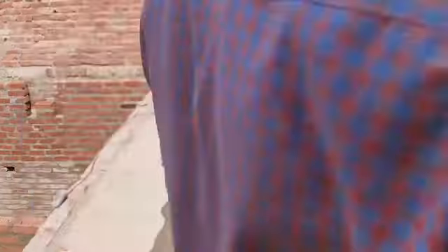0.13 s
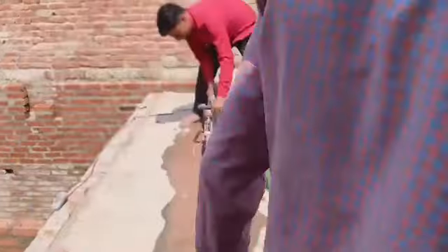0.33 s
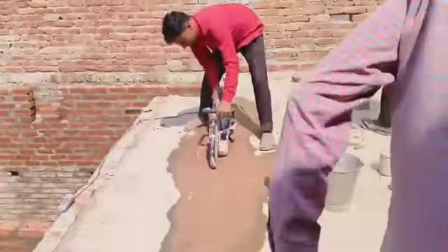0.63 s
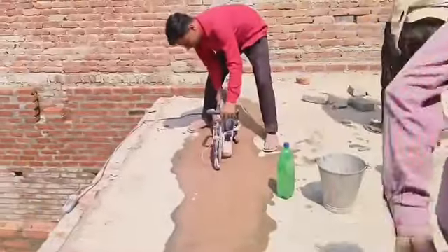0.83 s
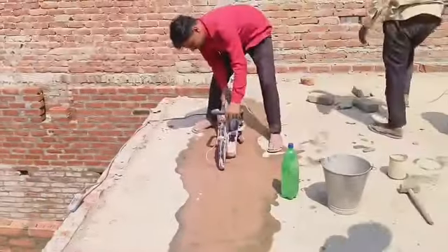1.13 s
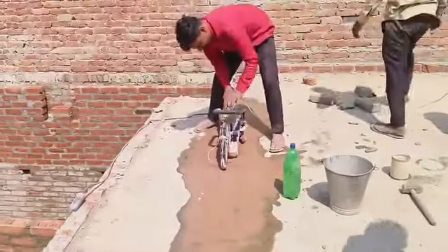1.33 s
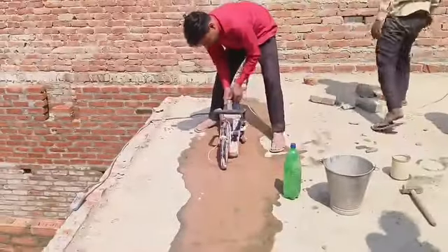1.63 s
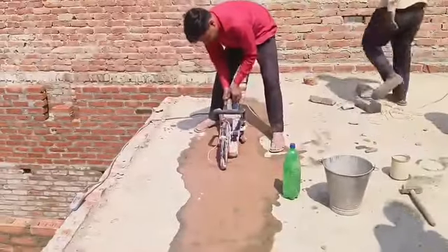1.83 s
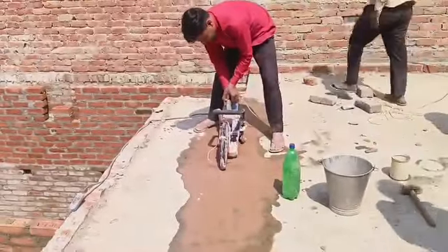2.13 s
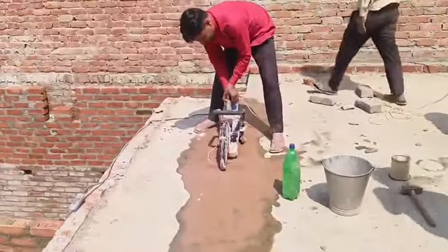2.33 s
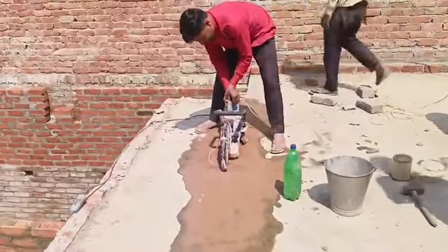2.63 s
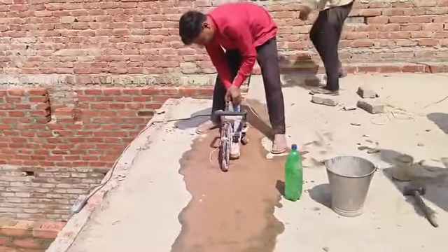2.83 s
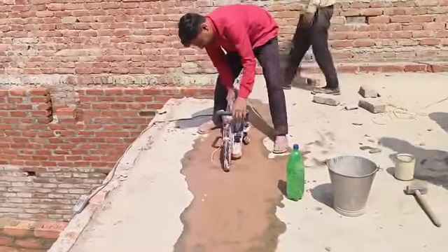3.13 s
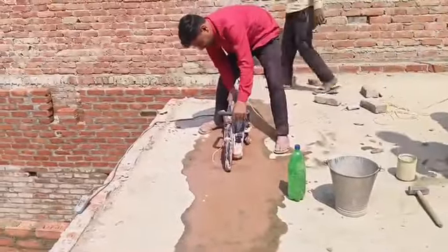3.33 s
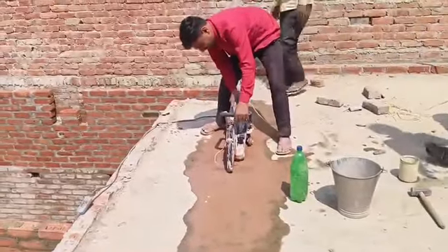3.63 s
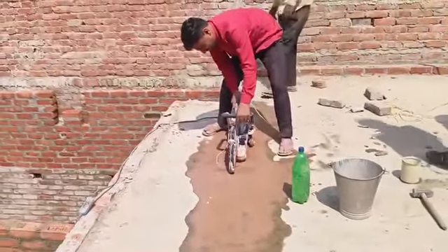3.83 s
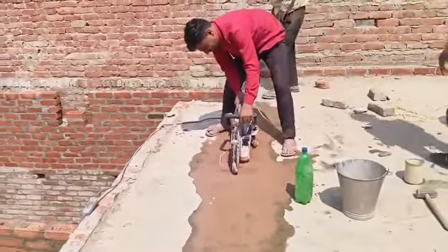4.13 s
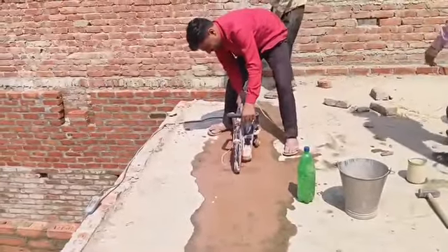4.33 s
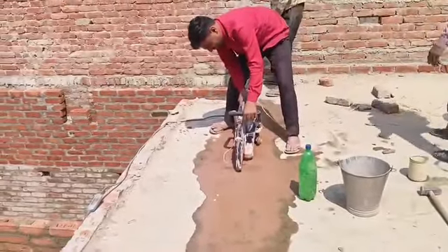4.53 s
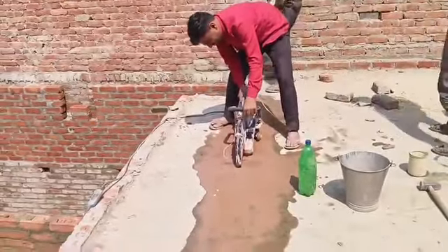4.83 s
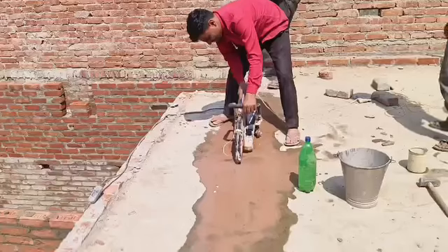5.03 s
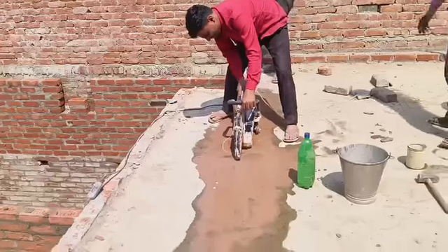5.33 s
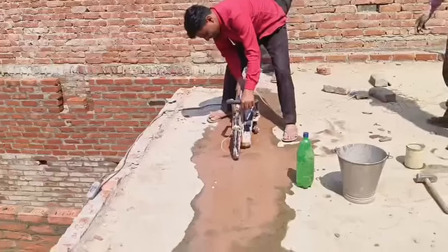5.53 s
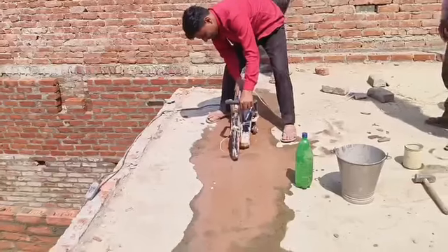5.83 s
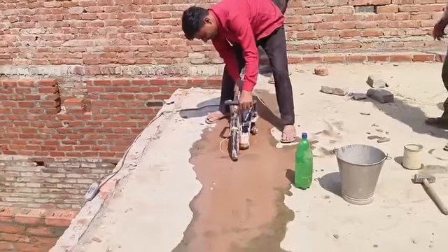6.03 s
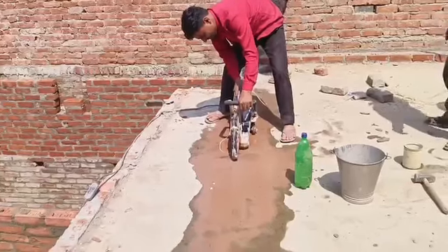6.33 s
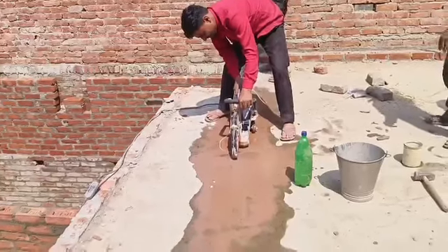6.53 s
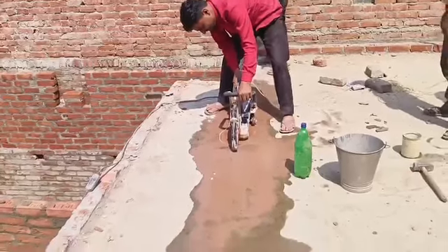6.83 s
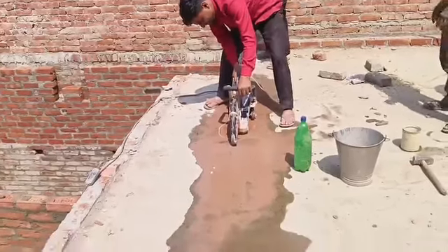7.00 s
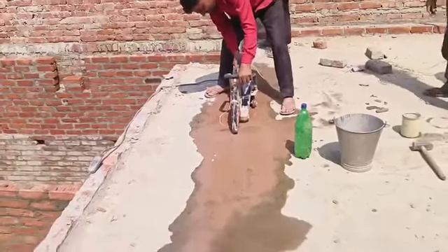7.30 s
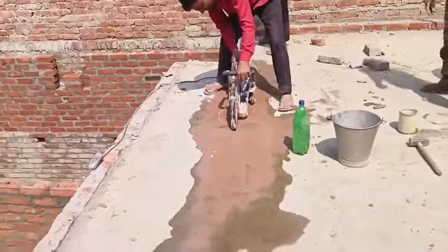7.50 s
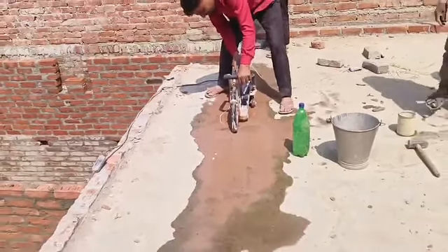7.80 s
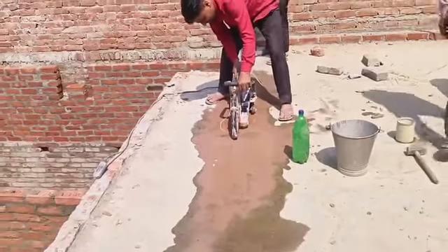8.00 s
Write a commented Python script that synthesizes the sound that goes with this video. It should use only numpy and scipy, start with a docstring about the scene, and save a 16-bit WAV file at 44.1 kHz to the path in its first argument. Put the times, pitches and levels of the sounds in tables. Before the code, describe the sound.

An electric saw works on a concrete slab a few metres away on an open rooftop. Its motor hums and the blade briefly bites, then eases off, the rubbing steel singing in high notes that step downward. Before halfway it digs in again and keeps grinding with a gritty, hissing chatter. The cut grows more hollow, and the metal guard rattles harder near the end.

```python
"""An electric saw with a wet blade cuts a concrete slab on an open rooftop, a few metres away.
First the motor hums, and at about 1 s the blade touches the slab once. It eases off: the motor slows
while rubbing makes the steel blade sing. At 3.5 s it bites in and chatters on. Tiny hits of grit ring
the blade guard and the slab, roof and walls scatter the sound, and the groove sounds more hollow as
the blade sinks. Near the end the saw is leaned on, and the guard rattles harder."""
import sys
import numpy as np
from scipy import signal
from scipy.fft import rfft, irfft
from scipy.io import wavfile
from scipy.ndimage import uniform_filter1d, map_coordinates

SR = 44100
rng = np.random.default_rng(int(sys.argv[2]) if len(sys.argv) > 2 else 0)


def int16_out(signal):
    """Quantize to a 16-bit WAV file."""
    q = np.round(np.clip(np.atleast_2d(signal).T, -1, 1) * 32767)
    wavfile.write(sys.argv[1], SR, q.astype(np.int16))


N = 359856
T = np.arange(N) / SR
HZ = np.maximum(np.fft.rfftfreq(N, 1 / SR), 1)

# How hard the blade bites (a touch, a long easing off, then the cut): time_s, level_db
BITE = [(0, -34.5), (.3, -37.5), (.77, -40), (.875, -29), (1.04, -28), (1.11, -34.5), (1.42, -34),
        (2.15, -37.5), (3.3, -38), (3.5, -34.5), (3.545, -26), (3.78, -27.5), (3.95, -27.5), (5.05, -28),
        (5.45, -29), (6.45, -28), (7.799, -29.5), (8.16, -30)]
# The blade grabs hard: time_s, rise_db, length_s
GRABS = [(0.536, 1, .035), (1.01, 0.5, 0.031), (1.74, 3.5, 0.035), (1.967, 2, 0.078), (2.474, 2, 0.11),
         (2.728, 4, 0.033), (3.323, 3, 0.032), (3.573, 0.5, 0.02), (3.6, 2.5, .012), (3.762, 1, .02),
         (3.79, 3.5, 0.032), (3.85, 3, 0.0074), (3.927, 0.5, 0.007), (4.169, 4, 0.018),
         (4.201, 3.5, 0.0089), (4.362, 3, 0.042), (4.474, 1, 0.03), (5.26, 2, 0.051), (5.593, 0.5, 0.053),
         (5.702, 1.5, 0.027), (5.882, 3, 0.023), (5.948, 3.5, .025), (6.006, 5.5, 0.015), (6.132, 5, 0.017),
         (6.198, 2.5, 0.0065), (6.367, 3.5, 0.051), (6.47, 5, 0.018), (6.7, 1, 0.03), (7.054, 1.5, .035),
         (7.217, 4, 0.067), (7.308, 2.5, 0.013), (7.467, 1, 0.042), (7.756, 1, 0.15)]
# The blade loses its grip for a moment: time_s, fall_db, half_length_s
SLIPS = [(3.96, 0.5, 0.036), (5.504, 1.5, 0.063), (6.32, 1.5, 0.016), (7.005, 3, 0.02), (8.06, 2, 0.011)]
# Overall tone of the grinding, from bass to treble: pitch_hz, gain_db
GRIND_TONE = [(25, -28), (48, -13), (95, -7), (150, -11.5), (230, -3.5), (330, -4.5), (490, -7.5),
              (800, 5.5), (1400, -2.5), (2000, -7), (4500, 1.5), (7500, 1.5), (8100, -10.5), (15500, -10.5)]
# Pitches that guard, blade and slab boost or weaken: pitch_hz, width_hz, left_db, right_db
RESONANCES = [(308.6, 29, 3.5, 5), (377.3, 74, 10.5, 3), (414, 21, 4.5, 0), (513, 45, -18.5, 0.5),
              (610, 90, -9, -3), (658, 28, 12.5, 3), (790, 110, -6.5, -0.5), (930, 117, 6.5, 5.5),
              (1250, 140, 2, 3), (1463, 126, -8.5, -13.5), (1588, 36, 8.5, 2), (1860, 180, 0, 0.5),
              (2346, 380, 1.5, 5), (2890, 54, -12, -14), (2980, 110, 4, -4.5), (3994, 280, 6, -2),
              (4300, 58, -3, 0), (4420, 97, 3.5, 3), (4880, 160, 3, 5.5), (5260, 110, 4, 5.5),
              (5370, 80, -7, -3), (5520, 60, 3, 5.5), (5590, 150, -13, -1), (5945, 200, 4, 4),
              (6700, 650, 5.5, -2.5), (7880, 54, -7, -6), (7960, 45, 9, 5), (8050, 120, -5, -5),
              (8230, 60, 4, 4), (8470, 80, -14, 0), (13560, 660, 4.5, 7)]
# Sound that differs between the ears, against the sound they share: pitch_hz, level_db
EAR_DIFFERENCE = [(40, -37), (130, -20), (350, -22), (700, -4.5), (1400, -2), (3000, -0.5), (5000, -3.5),
                  (15000, -2)]
# The grinding shifts sideways as people pass: time_s, left_minus_right_db
GRIND_PAN = [(0, -0.5), (.2, -3.5), (.55, 3), (.8, 2), (1.05, 0), (1.5, 0), (3.5, -0.1), (8.16, -1)]
# How deep the blade sits: time_s, depth_0_to_1
BLADE_DEPTH = [(3.7, 0.1), (5.2, 0.29), (6.8, 0.35), (7.6, 0.73)]
# Peaks and dips that change with depth: shallow_hz, deep_hz, width_hz, shallow_db, deep_db
GROOVE_PEAKS = [(1930, 1900, 410, -0.5, 9.5), (1980, 2260, 180, 1, -0.5), (2460, 2180, 150, 2.5, -14),
                (3380, 3600, 170, -6, 3), (3690, 3700, 51, -6.5, -7), (4220, 5600, 77, 1, 4),
                (6100, 6440, 240, -2, 7.5), (7140, 6700, 210, -1, -6.5)]
# Pitches brought out by rubbing on the groove's side: start_s, end_s, pitch_hz, width_hz, rise_db
RUBS = [(.55, 1.4, 3400, 420, 7.5), (0.723, 1.19, 2580, 300, 8), (3.52, 3.98, 4930, 1200, 2.5),
        (3.4, 5.2, 1850, 160, 1), (3.45, 7, 2320, 350, 2.5), (4.4, 7.003, 4320, 130, 4.5),
        (4.897, 6.9, 3115, 110, 8), (4.948, 8.3, 3294, 70, 9), (5.5, 6.9, 4720, 320, 3.5),
        (6.195, 6.8, 2390, 400, 4), (7.004, 8.11, 6100, 700, 1.5), (7.3, 8.2, 3990, 140, 1)]
# Narrow peaks and dips come and go at random as the saw rocks: pitch_hz, swing_db
ROCKING = [(500, 0), (1200, 1.9), (2200, 3.3), (5500, 3.0), (9000, 3.0), (15000, 2.6)]
# How hard the slab drums under the saw: time_s, level_db
SLAB_DRUMMING = [(0, -47), (.33, -35), (.55, -43), (1.07, -39), (1.3, -51.5), (2.1, -49), (2.75, -48),
                 (3.15, -48), (3.48, -44.5), (3.6, -40.5), (4.1, -39.5), (5.1, -36), (5.32, -32),
                 (5.5, -36.5), (6.65, -35.5), (7.1, -35.5), (7.28, -34.5), (7.6, -37), (8.16, -38)]
# The saw kicks, jolting the slab and the housing's drone: time_s, slab_change_db, drone_rise_db
KICKS = [(.419, 3, 3), (.76, -3, 12), (1.016, 0, 5), (2.79, 7, 6), (3.646, 6, 12), (3.818, 6, 12),
         (4.086, -6, 13), (4.3, 10, 2), (4.405, 4, 13), (4.677, -2, 15), (4.952, 2, 12.5), (5.02, 5, 2),
         (5.234, 6, 7), (5.281, -7, 16), (5.365, 4, 15.5), (5.428, -6, 11.5), (5.616, 4, 17),
         (5.715, 10, 4), (5.81, 3.5, 12), (5.963, -2, 11), (6.034, 4, 9.5), (6.286, 6.5, 7), (6.375, -1, 3),
         (6.555, -1, 3), (6.824, 6, 10), (7.05, 2, 11.5), (7.11, 5.5, 7), (7.211, 1, 12), (7.27, -2, 15),
         (7.337, -2, 14), (7.407, 0, 12), (7.459, 3, 12), (7.79, -2, 17), (7.904, -3, 16), (8.013, 4.5, 9),
         (8.102, -1, 15.5)]
# The blade sings one note after another as it slows:
# start_s, end_s, pitch_hz, fall_hz_per_s, bend_at_ends_hz, level_db, left_minus_right_db, roughness
BLADE_NOTES = [(0.349, 0.695, 4240, 33, 0.5, -39.5, 23, 0.78),
               (0.679, 0.85, 4230, 156, 1, -30.5, 21.5, 0.63), (.97, 1.2, 3320, 100, 0, -36, 0, 1.1),
               (1.172, 1.616, 3285, 108, 0, -31.5, 0, 0.74),
               (1.799, 2.433, 3255, 107.5, 1.5, -34.5, 5, 0.9), (2.06, 2.462, 3090, 131, 1, -32.5, 8, 0.66),
               (2.24, 2.55, 2950, 156, -2, -31, 3, 0.3), (2.566, 2.843, 2935, 0, 0.5, -32, 0, 0.84),
               (2.869, 3.636, 2726, 3, 42.5, -30, -6.5, 0.38)]
# The notes the guard rattles on: pitch_hz, rough_width_hz, gain_db
GUARD_NOTES = [(398, 37, 6.5), (666.5, 44, 9), (740, 38, 3), (1590, 54, -18), (1860, 140, -8)]
# How fast the motor turns: time_s, speed_hz
MOTOR_SPEED = [(0, 355), (.6, 353), (.9, 335), (1.2, 311), (1.7, 292), (2.15, 275), (2.9, 252), (3.2, 245),
               (3.6, 246)]
# The motor's hum swells: start_s, end_s, level_db
HUM_SWELLS = [(-.2, 0.9, -45), (1.1, 2.273, -48.5), (2.84, 3.595, -52.5)]
# Tone of the light air over the rooftop: pitch_hz, gain_db
AIR_TONE = [(25, -13), (48, 12), (100, 6), (160, -22), (500, 1), (2000, -46), (15000, -60)]

FREE_BITE_DB, LOADED_BITE_DB = -37, -30  # the blade runs free; the blade is fully loaded
USUAL_DRUM_DB, LOADED_MOTOR_HZ = -35.5, 246  # the slab and the motor during the cut
SIDES = np.array([[.5], [-.5]])  # a sideways shift raises one ear and lowers the other by half each


def grinding(blade_angle, motor_hz, bite_db, drum_db, load, chatter_db):
    """Grit rings the slab, guard and blade, pulsed by each turn and grab. Gives (bass, the rest)."""
    # a free blade brushes the groove once a turn; a loaded one judders
    force_db = chatter_db + 0.21 * wobble(47) + (.9 - 1.04 * load) * np.cos(blade_angle)
    sound = groove(ringing_parts())
    # each copy keeps only what lies below its pitch
    deck, slab, guard, disc = (shape(sound, 1 / (1 + (HZ / hz) ** 10)) for hz in (290, 520, 1450, 3600))
    push_db = bite_db - LOADED_BITE_DB
    throb_db = 2.05 * shiver(21.2) + kicks()[0]
    shake_db = drum_db - USUAL_DRUM_DB + throb_db
    # heavy parts sound low and follow the bite weakly; the grit's hiss follows it fully
    thud = unit(deck) * undb(-45.5 + 0.54 * push_db + 0.54 * shake_db + 0.7 * force_db)
    drum = unit(slab - deck) * undb(drum_db - 2 + throb_db + 0.46 * force_db)
    speed_db = 0.025 * (motor_hz - LOADED_MOTOR_HZ)  # a faster motor makes the guard growl more
    growl = unit(guard - slab) * undb(-38.5 + 0.63 * push_db + 0.25 * shake_db + force_db + speed_db)
    ring = unit(disc - guard) * undb(-32 + 0.55 * push_db + 0.68 * force_db + 1.17 * load * snags())
    hiss = unit(sound - disc) * undb(bite_db + 2 + force_db + load * snags())
    return thud + drum, growl + ring + hiss


def grit(hits_per_s, unevenness_db):
    """A dense spray of tiny hits of diamond on stone, a few harder than the rest."""
    hits = rng.random(N) < hits_per_s / SR
    strength = rng.standard_normal(N)
    extra_db = unevenness_db * np.minimum(rng.exponential(size=N), 5)
    return unit(hits * strength * undb(extra_db))


def ringing_parts():
    """Each hit of grit sets guard, blade and slab ringing, a little differently for each ear."""
    shared, around = (echoes(grit(hits_per_s=20000, unevenness_db=1.53)) for _ in range(2))
    spread = undb(spectrum(EAR_DIFFERENCE))
    shared = shape(shared, 1 / np.hypot(1, spread))
    around = shape(around, spread / np.hypot(1, spread))
    ears = []
    for ear, hits in enumerate((shared + around, shared - around)):
        peaks_db = sum(ear_db[ear] * peak(HZ, hz, width) for hz, width, *ear_db in RESONANCES)
        ears.append(shape(hits, ringing_filter(spectrum(GRIND_TONE) + peaks_db)))
    return np.array(ears)


def chatter(load, attack_share=0.71, release_share=0.62, slack_s=0.3, slack_share=0.16):
    """Swing of the cutting force in dB: the blade judders more under load, grabs and slips."""
    db = (0.5 + 0.26 * load) * shiver(26)
    for time_s, rise_db, length_s in GRABS:
        near = np.abs(T - time_s) < .4
        lag = T[near] - time_s
        width_s = length_s * np.where(lag < 0, attack_share, release_share)
        grab = np.exp(-(lag / width_s) ** 2)
        slack = slack_share * np.exp(-(lag / slack_s) ** 2)  # the blade runs slack around a grab
        db[near] += rise_db * (grab - slack)
    return db - sum(fall_db * bump(T - time_s, half_s) for time_s, fall_db, half_s in SLIPS)


def snags(per_s=45, fade_s=.011):
    """Swing in dB as hard pebbles suddenly catch the rim and crumble away."""
    hits = (rng.random(N) < per_s / SR).astype(float)
    push = signal.lfilter([1], [1, -np.exp(-1 / (fade_s * SR))], hits)
    return unit(push - push.mean())


def kicks(half_length_s=0.017):
    """The saw's kicks briefly change two levels, in dB: (the slab, the housing's drone)."""
    slab_db, drone_db = np.zeros((2, N))
    for time_s, slab_change_db, drone_rise_db in KICKS:
        near = np.abs(T - time_s) < .15
        kick = bump(T[near] - time_s, half_length_s)
        slab_db[near] += slab_change_db * kick
        drone_db[near] += drone_rise_db * kick
    return slab_db, drone_db


def groove(sound, rub_fade_s=0.17):
    """The hollow between blade, guard and groove changes the tone as the blade sinks, rubs and rocks."""
    hz, t, frames = signal.stft(sound, SR, nperseg=2048)  # the pitches in each short slice of time
    depth = np.interp(t, *np.transpose(BLADE_DEPTH))
    db = 0
    for shallow_hz, deep_hz, width, shallow_db, deep_db in GROOVE_PEAKS:
        centre = shallow_hz + (deep_hz - shallow_hz) * depth
        db += (shallow_db + (deep_db - shallow_db) * depth) * peak(hz[:, None], centre, width)
    for start, end, centre, width, rise_db in RUBS:
        contact = np.clip(np.minimum(t - start, end - t) / rub_fade_s, 0, 1)
        db += rise_db * contact * peak(hz[:, None], centre, width)
    # rocking: random patches, smoothed over pitch and time
    patches = rng.standard_normal((3, len(hz), len(t)))
    for _ in range(2):
        patches = uniform_filter1d(uniform_filter1d(patches, size=4, axis=1), size=5, axis=2)
    patches = unit(patches[0] + patches[1:] * .5)  # mostly shared by the ears
    patches -= .33 * (patches ** 2 - 1)  # echoes cancel more deeply than they add up
    rocking_db = patches * np.interp(hz, *np.transpose(ROCKING))[:, None]
    return signal.istft(frames * undb(db + rocking_db), SR)[1][:, :N]


def echoes(sound, die_away_s=.13, wander_share=.005):
    """Short rings and echoes ripple the tone; they wander as the saw shifts in its groove."""
    tail = rng.standard_normal(N) * undb(-60 * T / die_away_s)
    tail /= np.sqrt(np.sum(tail ** 2))
    share = undb(-1) * HZ / (HZ + 1800) / (1 + (HZ / 11000) ** 4)  # the finest spray hardly rings
    echoing = shape(sound, (1 + share * rfft(tail)) / np.hypot(1, share))
    position = np.cumsum(1 + wander_share * wobble(0.93))  # running faster or slower bends the pitch
    return unit(map_coordinates(echoing, [position], order=3, mode="mirror"))


def singing_blade(blade_angle, chatter_db, swell_db=11.5, attack_s=0.13, release_s=0.11):
    """Rubbing keeps the steel ringing: each note swells and dies back; rough contact breaks it up."""
    out = np.zeros((2, N))
    waver_hz = 16 * wobble(97)
    flutter_db = 3.2 * shiver(21) + 3.2 * np.cos(blade_angle)
    for start, end, hz, fall_hz_per_s, bend_hz, db, pan_db, roughness in BLADE_NOTES:
        on = (T > start) & (T < end)
        t = T[on]
        edge_fade = np.clip(np.minimum(t - start, end - t) / 0.016, 0, 1)
        swell = np.clip(np.minimum((t - start) / attack_s, (end - t) / release_s), 0, 1)
        lag = t - t.mean()
        pitch_hz = hz - fall_hz_per_s * lag + bend_hz * (2 * lag / (end - start)) ** 2
        phase = turning(pitch_hz + roughness * waver_hz[on]) + 0.074 * np.sin(blade_angle[on])
        level_db = db - swell_db * (1 - swell) + roughness * flutter_db[on] + 0.33 * chatter_db[on]
        # the two faces of the blade reach the ears out of step
        faces = np.array([np.sin(phase), np.sin(phase + 1.55)])
        out[:, on] += edge_fade * undb(level_db + SIDES * pan_db) * faces
    return out


def rim_rasp(blade_angle, motor_hz, pitch_multiple=11.45):
    """The rim scrapes the groove's side: a rough band that falls and fades as the motor slows."""
    phase = turning(pitch_multiple * motor_hz)
    band = np.array([wobble(470) * np.cos(phase) + wobble(280) * np.sin(phase) for _ in range(2)])
    level_db = -38.5 + 2.5 * ramp(start_s=0, length_s=0.86) + 0.43 * np.cos(blade_angle)
    return band * undb(level_db) * (1 - ramp(start_s=2.51, length_s=0.89))


def housing_drone(drum_db, pitch_hz=377.7, waver_hz=6.99):
    """The slab's drumming makes the saw's housing drone on one note, which throbs at each kick."""
    phase = turning(pitch_hz + waver_hz * wobble(13.9))
    level_db = -42 + 0.62 * (drum_db - USUAL_DRUM_DB) + shiver(13) + kicks()[1]
    return np.sin(phase) * undb(level_db + SIDES * 5.5)  # louder on the left


def guard_rattle(bite_db, drum_db, chatter_db):
    """The thin guard buzzes on a few notes as the slab shakes it and the blade grabs."""
    level_db = -40.5 + 0.8 * (drum_db - USUAL_DRUM_DB) + 0.95 * (bite_db - LOADED_BITE_DB)
    lean_db = 7.5 * ramp(start_s=7.36, length_s=0.22)  # the saw is leaned on
    notes = sum(undb(db) / (1 + 1j * (HZ - hz) / (0.69 * width)) ** 2 for hz, width, db in GUARD_NOTES)
    middle, side = (shape(grit(hits_per_s=2500, unevenness_db=0.57), notes) for _ in range(2))
    buzz = unit(np.array([middle + 0.81 * side, middle - 0.58 * side]))
    return buzz * undb(level_db + lean_db + chatter_db + 1.6 * wobble(30))


def motor_hum(motor_hz, fade_s=0.13):
    """The motor hums unevenly at its turning rate, in swells that end as the cut begins."""
    swell = sum(undb(db) * ramp(start, fade_s) * (1 - ramp(end - fade_s, fade_s))
                for start, end, db in HUM_SWELLS)
    phase = turning(motor_hz * (1 + 0.0072 * wobble(23)))
    hum = unit(np.sin(phase) + undb(-14.5) * np.sin(2 * phase))
    return swell * undb(0.37 * wobble(9.3)) * hum


def rooftop_air(level_db=-64.5):
    """Open air makes a faint low rumble that slowly rises and falls."""
    gain = undb(level_db + 2.3 * wobble(0.87))
    return gain * unit(shape(rng.standard_normal(N), undb(spectrum(AIR_TONE))))


def undb(db):
    """Turn decibels into a number to multiply by."""
    return 10 ** (np.asarray(db) / 20)


def unit(x):
    """Scale to a typical size (root mean square) of 1."""
    return x / np.sqrt(np.mean(x ** 2))


def curve(table):
    """Join the points of a time table with straight lines."""
    return np.interp(T, *np.transpose(table))


def spectrum(table):
    """Join the points of a pitch table, giving dB at every pitch."""
    hz, db = np.transpose(table)
    return np.interp(np.log(HZ), np.log(hz), db)


def shape(x, gain):
    """Turn each pitch in a sound up or down by its own gain."""
    return irfft(rfft(x) * gain, N)


def ringing_filter(db):
    """A filter with these gains that rings after each hit, not before it (minimum phase)."""
    cepstrum = irfft(np.log(undb(db)), N)
    return np.exp(rfft(2 * cepstrum * (np.arange(N) < N // 2)) - cepstrum[0])


def peak(hz, centre_hz, width_hz):
    """A hill of height 1 around one pitch."""
    return 1 / (1 + (2 * (hz - centre_hz) / width_hz) ** 2)


def bump(distance, half_width):
    """A flat-topped hill of height 1 around zero."""
    return 1 / (1 + (distance / half_width) ** 4)


def ramp(start_s, length_s):
    """Rise from 0 to 1 over this stretch of time."""
    return np.clip((T - start_s) / length_s, 0, 1)


def wobble(rate_hz):
    """A smooth random wobble of typical size 1, up to about this rate."""
    return unit(shape(rng.standard_normal(N), bump(HZ, rate_hz)))


def shiver(rate_hz):
    """A wobble with its slow drift taken out."""
    swing = wobble(rate_hz)
    return unit(swing - uniform_filter1d(swing, size=9000))


def turning(hz):
    """The angle, in radians, of something that turns at this rate."""
    return 2 * np.pi * np.cumsum(hz) / SR


def scene(gear_ratio=5.35):
    """The saw and the air around it; grinding and rasp shift sideways as people pass."""
    motor_hz, bite_db, drum_db, pan_db = map(curve, (MOTOR_SPEED, BITE, SLAB_DRUMMING, GRIND_PAN))
    blade_angle = turning(motor_hz * (1 + 0.024 * wobble(4.4)) / gear_ratio)
    load = np.clip((bite_db - FREE_BITE_DB) / (LOADED_BITE_DB - FREE_BITE_DB), 0, 1)
    chatter_db = chatter(load)
    bass, grind = grinding(blade_angle, motor_hz, bite_db, drum_db, load, chatter_db)
    scraping = (grind + rim_rasp(blade_angle, motor_hz)) * undb(SIDES * pan_db)
    singing = singing_blade(blade_angle, chatter_db)
    body = housing_drone(drum_db) + guard_rattle(bite_db, drum_db, chatter_db) + motor_hum(motor_hz)
    return bass + scraping + singing + body + rooftop_air()


def record(dry, top_hz=15800):
    """Cut off the very highest treble."""
    return signal.sosfilt(signal.ellip(10, .2, 80, top_hz, fs=SR, output="sos"), dry)


dry = scene()
out = record(dry)
int16_out(out)
```